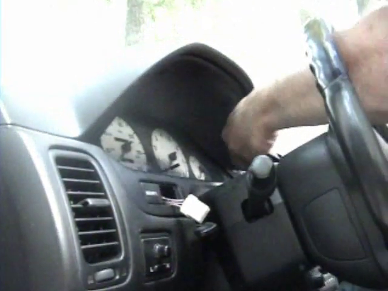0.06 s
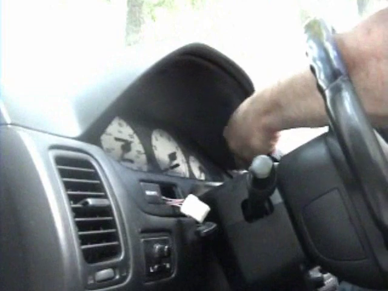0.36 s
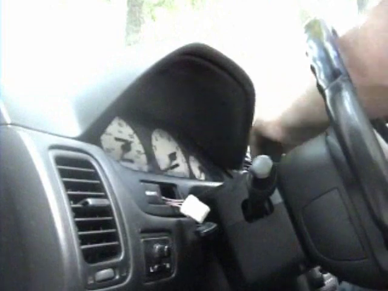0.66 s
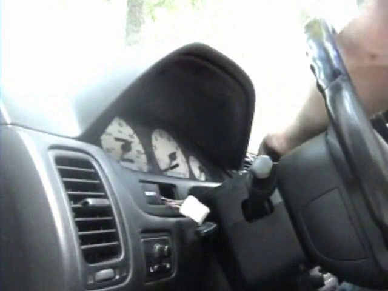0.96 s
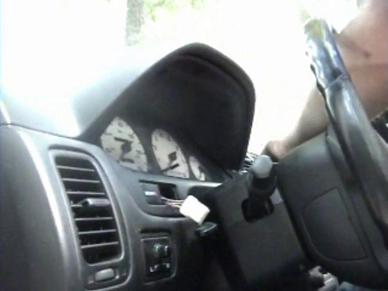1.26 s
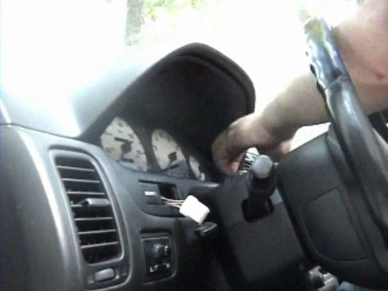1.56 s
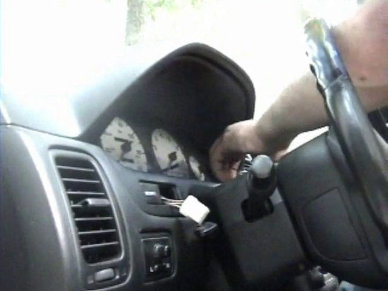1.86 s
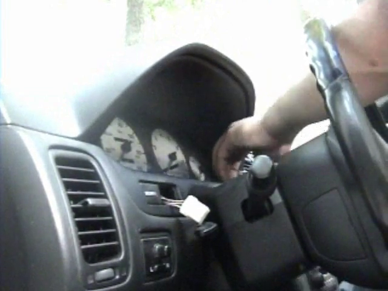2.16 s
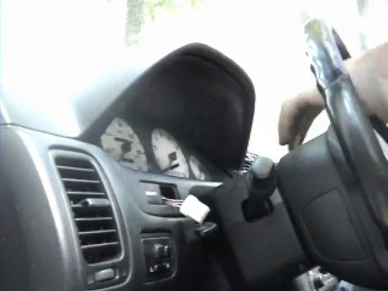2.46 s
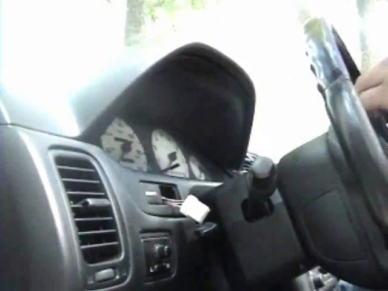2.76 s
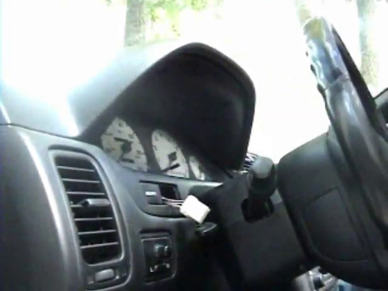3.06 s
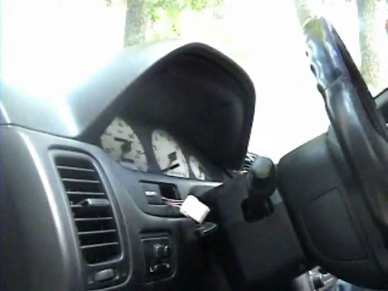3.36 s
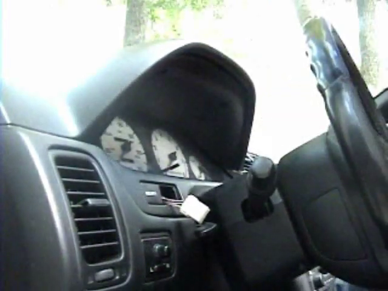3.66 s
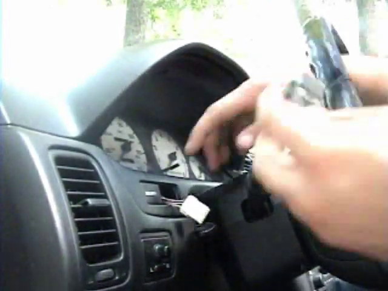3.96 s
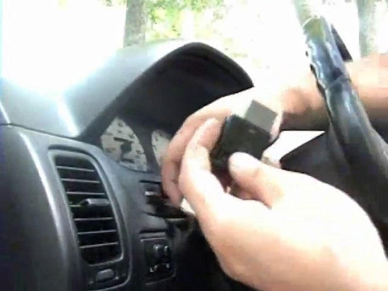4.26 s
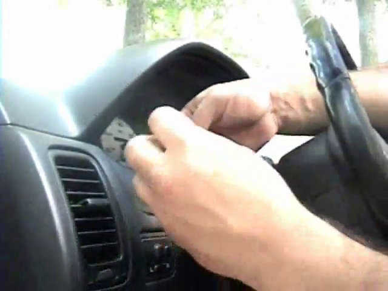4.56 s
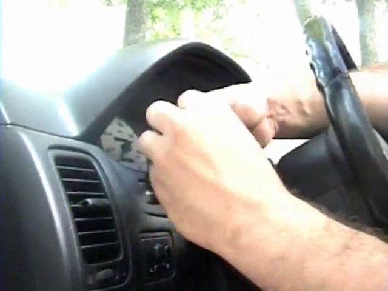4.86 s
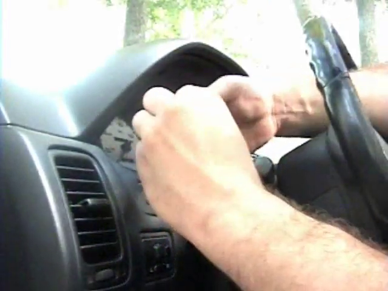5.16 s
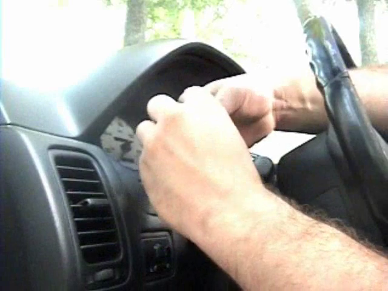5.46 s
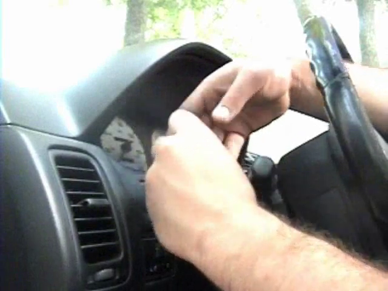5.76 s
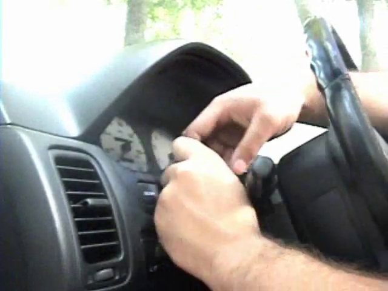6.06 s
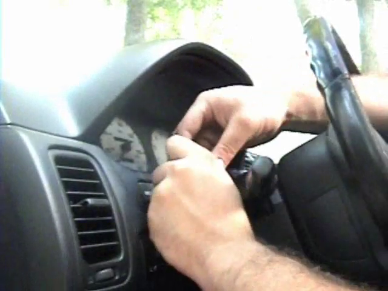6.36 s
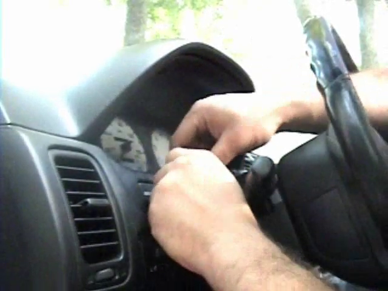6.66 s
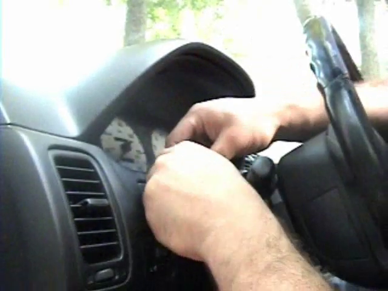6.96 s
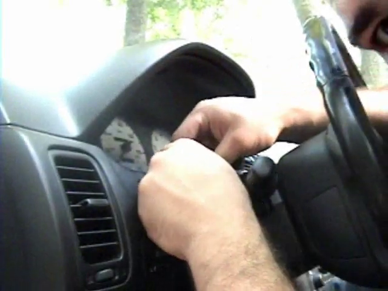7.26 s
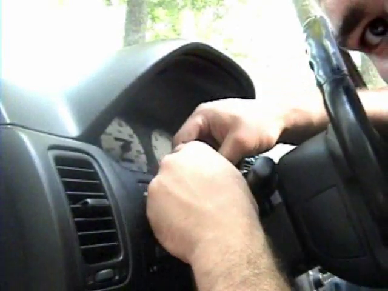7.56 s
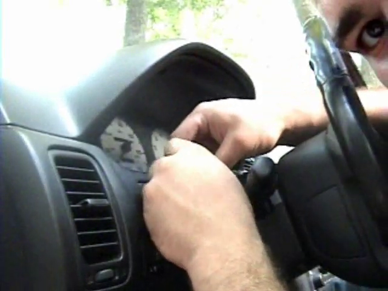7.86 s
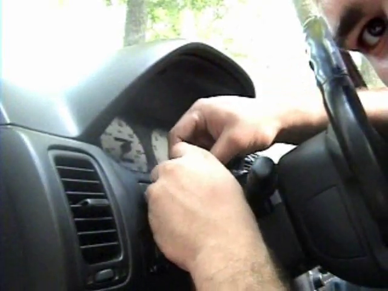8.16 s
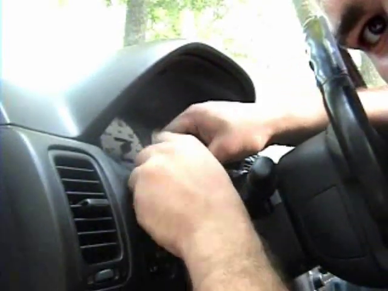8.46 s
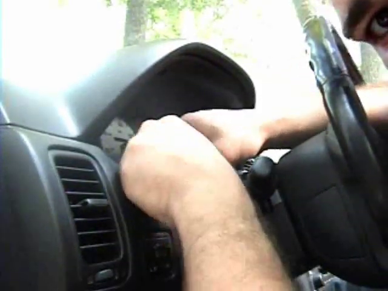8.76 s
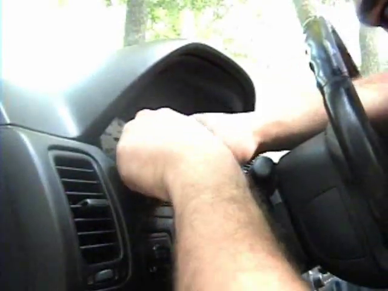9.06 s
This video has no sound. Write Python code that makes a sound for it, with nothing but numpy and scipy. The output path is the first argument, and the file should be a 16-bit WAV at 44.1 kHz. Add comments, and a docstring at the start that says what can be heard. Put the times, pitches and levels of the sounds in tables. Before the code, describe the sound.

A switch and its connector are pressed into car dashboard trim, with sharp snaps, small knocks and scraping over a faint cabin rumble.

```python
"""Close plastic snaps and knocks: hands work a switch and its connector into a parked car's dashboard.
Each contact rings the small part and the panel behind it (the switch itself when held free) and dies
fast in the padded cabin; some trail a low dashboard boom. Between the clicks plastic scrapes and squeaks,
and a spring buzzes once as the connector latches. A faint cabin rumble lies underneath."""
import sys
import numpy as np
from scipy import signal
from scipy.fft import rfft, irfft, next_fast_len
from scipy.io import wavfile

SR = 44100
rng = np.random.default_rng(int(sys.argv[2]) if len(sys.argv) > 2 else 0)


def master_out(mix):
    """Clip the mix to full scale and print it as 16-bit PCM to the path in sys.argv[1]."""
    frames = np.transpose(np.atleast_2d(mix))
    ceiling = np.clip(frames, -1, 1)
    pcm = np.round(ceiling * 32767).astype(np.int16)
    wavfile.write(sys.argv[1], SR, pcm)


N = 410552
EVENT_SAMPLES, CONTACT_SAMPLES, LEAD_SAMPLES = 16384, 8192, 400


def undb(db):
    """Decibels to gain."""
    return 10 ** (np.asarray(db) / 20)


def unit(x):
    """Scale to rms 1."""
    return x / np.sqrt(np.mean(x ** 2))


def freqs(size):
    """FFT bin frequencies in Hz, floored at 1."""
    return np.maximum(np.fft.rfftfreq(size, 1 / SR), 1)


def along(points, hz):
    """Interpolate (f/Hz, value) points on a log-frequency axis."""
    f, value = np.transpose(points)
    return np.interp(np.log(hz), np.log(f), value)


def hump(f, hz, width_hz):
    """One resonance, 1 at its centre."""
    return 1 / (1 + (2 * (f - hz) / width_hz) ** 2)


def rolloff_db(ratio):
    """First-order slope: low-pass for f / corner, high-pass for corner / f."""
    return -10 * np.log10(1 + ratio ** 2)


def decay(t, t60_s):
    """Exponential fall, 60 dB in t60_s."""
    return np.exp(-np.log(1000) * t / t60_s)


def shape(x, db):
    """Zero-phase filter from a dB curve."""
    return irfft(rfft(x) * undb(db), x.shape[-1])


def ring(x, db):
    """Minimum-phase filter from a dB curve: resonances ring after the blow."""
    cepstrum = irfft(np.log(undb(db)))
    half = len(cepstrum) // 2
    cepstrum[1:half] *= 2
    cepstrum[half + 1:] = 0
    return irfft(rfft(x) * np.exp(rfft(cepstrum)))


def add(out, x, start_s):
    """Mix a mono or stereo sound into both channels."""
    i = max(int(start_s * SR), 0)
    out[:, i:i + x.shape[-1]] += x[..., :max(N - i, 0)]


def walk(rate_hz, size):
    """Smooth random wander, spread near 1."""
    steps = rng.standard_normal(int(size / SR * rate_hz) + 2)
    return np.interp(np.arange(size) / SR * rate_hz, np.arange(len(steps)), steps)


# Cabin noise spectrum: f/Hz, relative density/dB
CABIN_SPECTRUM = [(25, -27), (60, -11), (95, -9), (116, 1.5), (142, -10), (185, -5.5), (270, -14),
                  (370, -17.5), (480, -17), (570, -12.5), (700, -16), (900, -17.5), (1400, -22),
                  (3000, -27.5), (5000, -30.5), (7600, -37)]
# Cabin noise width: f/Hz, side over mid/dB
CABIN_WIDTH = [(60, -7.5), (150, -11.5), (300, -1), (900, 0), (2500, 1.5), (4400, -9.5), (7500, -43.5)]


def cabin(level_db=-46, waver_db=0.7, waver_hz=5, rumble_top_hz=600):
    """Outdoor rumble booms faintly in the cabin and wavers under a smooth hiss."""
    size = next_fast_len(N, real=True)
    f = freqs(size)
    mid, side = shape(rng.standard_normal((2, size)), along(CABIN_SPECTRUM, f))
    side = shape(side, along(CABIN_WIDTH, f))
    noise = np.array([mid + side, mid - side])
    rumble = shape(noise, rolloff_db(f / rumble_top_hz))
    noise += rumble * (undb(waver_db * walk(waver_hz, size)) - 1)
    return undb(level_db) * unit(noise[:, :N])


# Skin and plastic squeaks: t/s, length/s, level/dB, first f/Hz, last f/Hz
SQUEAKS = [(.17, .19, -59, 2550, 2450), (2.74, .12, -60, 3700, 3400), (4.02, .12, -57.5, 1140, 1290),
           (4.07, .17, -57, 1040, 880), (4.14, .11, -58, 1290, 1040), (8.307, .026, -35, 4400, 4560)]


def squeaks(jitter=0.0088, jitter_hz=200, steady_cycles=7):
    """Slips fall into a loose rhythm and sound a rough gliding tone."""
    out, t = np.zeros((2, N)), np.arange(EVENT_SAMPLES) / SR
    for start, length, db, first_hz, last_hz in SQUEAKS:
        progress = np.minimum(t / length, 1)
        glide_hz = first_hz + (last_hz - first_hz) * progress
        hz = glide_hz * (1 + jitter * walk(jitter_hz, len(t)))
        grip_hz = first_hz / steady_cycles
        grip = walk(grip_hz, len(t)) + 1j * walk(grip_hz, len(t))  # slip strength and timing wander
        tone = np.real(grip * np.exp(2j * np.pi * np.cumsum(hz) / SR))
        add(out, 2 * undb(db) * np.sin(np.pi * progress) * tone, start)
    return out


def spring(start_s=5.499, hz=3270, width_hz=380, level_db=-39, t60_s=0.29):
    """The spring in the switch buzzes on after the connector latches."""
    out, t = np.zeros((2, N)), np.arange(EVENT_SAMPLES) / SR
    resonance_db = 20 * np.log10(hump(freqs(len(t)), hz, width_hz))
    buzz = unit(shape(rng.standard_normal(len(t)), resonance_db))
    add(out, undb(level_db) * decay(t, t60_s) * buzz, start_s)
    return out


# Low dashboard booms after snaps and knocks: t/s, level/dB, boom f/Hz, sway over boom/dB
BOOMS = [(0.061, -30.5, 168, -23), (0.419, -30, 113.8, 1), (1.125, -45, 113, 12), (1.403, -23.5, 127.3, -6),
         (2.098, -36, 186, -0.5), (4.275, -28.5, 114.6, -28), (4.291, -33.5, 169, -28),
         (5.508, -32, 221, -2), (6.159, -28, 112, -22), (6.325, -30.5, 178, -25), (8.347, -30.5, 159, -23),
         (9.223, -33, 122, -2)]


def booms(rise_s=0.002, t60_s=0.22, sway_hz=37):
    """The dashboard booms low just after a snap or knock and sways in its lowest mode."""
    out, t = np.zeros((2, N)), np.arange(EVENT_SAMPLES) / SR
    swing = decay(t, t60_s) * (1 - np.exp(-t / rise_s))
    for start, db, boom_hz, sway_db in BOOMS:
        boom = np.sin(2 * np.pi * boom_hz * t)
        sway = undb(sway_db) * np.sin(2 * np.pi * sway_hz * t)
        add(out, undb(db) * swing * (boom + sway), start)
    return out


# Panel and cabin decay: f/Hz, t60/s
CABIN_DECAY = [(70, 0.45), (200, .13), (550, 0.12), (1500, 0.088), (4000, 0.071), (8000, 0.11)]


def reflections(size, build_s=0.00058, build_cycles=0.98):
    """Dense cabin reflections as (mid, side); the bass builds late and stays."""
    t, f = np.arange(size) / SR, freqs(size)
    noise = rfft(rng.standard_normal((2, size)))
    centres = [hz for hz, _ in CABIN_DECAY]
    out = 0
    for (hz, t60_s), selector in zip(CABIN_DECAY, np.eye(len(centres))):
        band = irfft(noise * along(list(zip(centres, selector)), f))
        fade = decay(t, t60_s) * (1 - np.exp(-t / (build_s + build_cycles / hz)))
        out = out + band * fade / np.linalg.norm(fade)
    return out


# Contact and scrape width: f/Hz, side gain/dB
CONTACT_WIDTH = [(60, -6), (250, -20.5), (700, -11.5), (1500, -4), (2600, -8.5), (4000, -9), (8000, -22.5)]
# Left-right level difference: f/Hz, share of pan_db
PAN_SHARE = [(300, .05), (600, 0.27), (1300, 0.37), (2600, 0.78), (3600, 0.059)]


def place(mid, side, pan_db):
    """Mid and side to stereo, leaning left mostly in the middle frequencies."""
    f = freqs(len(mid))
    side = shape(side, along(CONTACT_WIDTH, f))
    lean_db = pan_db * along(PAN_SHARE, f) / 2
    return np.array([shape(mid + side, lean_db), shape(mid - side, -lean_db)])


# Dashboard panel and cabin modes: f/Hz, width/Hz, gain/dB
PANEL_MODES = [(106, 37, 8), (176.3, 88, 10.5), (246, 62, 10), (425, 142, 11), (599, 33, 7.5),
               (785, 180, 6), (984, 74, 6.5), (1270, 120, 2.5), (2010, 120, 0), (2507, 200, 3),
               (3970, 590, 3.5), (7430, 900, -5)]
# Hand-held switch modes: f/Hz, width/Hz, gain/dB
SWITCH_MODES = [(127, 16, 2), (242, 26, 3.5), (1617, 230, 10.5), (1885, 170, 7.5), (2240, 920, 4),
                (2605, 150, 3.5), (3470, 46, -6), (4540, 330, 3.5), (6160, 2700, 10)]


def modes_db(modes, f):
    """Colour that a body's resonances give to whatever touches it."""
    return sum(db * hump(f, hz, width_hz) for hz, width_hz, db in modes)


# Plastic and skin sliding: t/s, length/s, level/dB, centre f/Hz
SCRAPES = [(.005, 0.19, -52, 2800), (.507, 0.18, -44, 1160), (0.651, .16, -48.5, 3120),
           (0.923, 0.048, -33, 1700), (0.954, .059, -42, 1000), (1.461, 0.22, -34.5, 1340),
           (1.607, 0.31, -48.5, 1310), (2.023, 0.15, -34.5, 1500), (2.26, 0.084, -43.5, 1470),
           (2.688, 0.31, -56.5, 3300), (3.709, 0.073, -51, 5300), (3.856, 0.043, -49.5, 4850),
           (4.28, 0.12, -48.5, 2200), (6.382, .32, -46.5, 1490), (7.159, 0.12, -45, 1500),
           (8.111, 0.13, -47, 1300), (8.247, .063, -43, 1590), (8.298, 0.033, -33.5, 5500),
           (8.457, 0.3, -45.5, 1130)]


def scrapes(grains_per_s=900, spread_db=6, jerk_db=4, jerk_hz=70, focus_db=10, focus_q=0.74,
            panel_share=0.94, low_hz=200, dull_hz=3000):
    """Sliding plastic catches and slips in dense, uneven grains that ring the panel."""
    out, size = np.zeros((2, N)), EVENT_SAMPLES
    t, f = np.arange(size) / SR, freqs(size)
    colour_db = panel_share * modes_db(PANEL_MODES, f) + rolloff_db(f / dull_hz) + rolloff_db(low_hz / f)
    for start, length, db, hz in SCRAPES:
        stroke = np.sin(np.pi * np.minimum(t / length, 1))
        catches = rng.random(size) < grains_per_s / SR
        strength = undb(spread_db * rng.standard_normal(size) + jerk_db * walk(jerk_hz, size))
        grains = catches * strength * stroke * rng.choice([-1, 1], size)
        sound = signal.fftconvolve(reflections(size), grains[None], axes=1)[:, :size]
        sound[0] += grains  # direct sound, mid only
        sound = ring(sound, colour_db + focus_db * hump(f, hz, hz / focus_q))
        stereo = unit(place(*sound, pan_db=6)) * np.sqrt(length * SR / size)  # rms 1 over the stroke
        add(out, undb(db) * stereo, start)
    return out


def contact_force(hard_db, creep_db=-10, creep_s=0.0015, slip_s=0.002, softening=0.49):
    """A catch creeps up, then lets go in a rush of tiny slips, longer when soft."""
    t = (np.arange(CONTACT_SAMPLES) - LEAD_SAMPLES) / SR
    release_s = slip_s * undb(-softening * min(hard_db, 0))
    fade = np.exp(-np.abs(t) / np.where(t < 0, creep_s, release_s))
    slips = np.where(t < 0, undb(creep_db), 1) * fade * rng.standard_normal(len(t))
    return slips / np.linalg.norm(slips)


# Edges of six contact bands: f/Hz
BAND_EDGES = [60, 250, 650, 1400, 2500, 4500, 8000]


def band_db(x, contact_s=0.0024):
    """Level per band: its energy over the time of one contact."""
    power = np.abs(rfft(x)) ** 2 * 2 / (len(x) * contact_s * SR)
    return 10 * np.log10(np.histogram(freqs(len(x)), BAND_EDGES, weights=power)[0])


# Contact colour, a row per band: level/dB, share of weight, share of hardness
CONTACT_COLOUR = [(-2, 1.18, 0.24), (1.5, 1.2, 0.024), (1, 0.81, 0.095), (0, 0.12, 0.035),
                  (-4.5, 0.068, 0.54), (-10.5, 0.26, 1)]


def contact(body, weight_db, hard_db, ring_hz, ring_db, direct_db, ring_q=6.6, part_hz=600, sub_hz=50):
    """A contact rings the part, its body and the cabin; weight adds bass, hardness treble."""
    f = freqs(CONTACT_SAMPLES)
    sound = np.pad(reflections(CONTACT_SAMPLES), ((0, 0), (LEAD_SAMPLES, 0)))[:, :CONTACT_SAMPLES]
    direct = ring(contact_force(hard_db), rolloff_db(part_hz / f))  # a small part radiates little bass
    sound[0] += undb(direct_db) * direct
    sound = ring(sound, modes_db(body, f) + rolloff_db(sub_hz / f))
    centres = np.sqrt(np.multiply(BAND_EDGES[:-1], BAND_EDGES[1:]))
    colour_db = np.dot(CONTACT_COLOUR, [1, weight_db, hard_db])
    for _ in range(2):  # pull the band levels towards colour_db
        gains_db = colour_db - band_db(sound[0])
        sound = ring(sound, along(list(zip(centres, gains_db)), f))
    part_power = 1 + (undb(ring_db) ** 2 - 1) * hump(f, ring_hz, ring_hz / ring_q)
    sound = ring(sound, 10 * np.log10(part_power))
    return place(*sound, pan_db=9)


# Switch held free of the panel: first t/s, last t/s
IN_HAND = [(3.6, 4.1), (4.8, 6.0)]


def in_hand(time_s):
    """True while the switch is held free."""
    return any(first < time_s < last for first, last in IN_HAND)


def knock(time_s, weight_db, hard_db):
    """A plain contact against the trim, or higher and drier on the hand-held switch."""
    if in_hand(time_s):
        return contact(SWITCH_MODES, weight_db, hard_db, ring_hz=2010, ring_db=8.9, direct_db=3.5)
    return contact(PANEL_MODES, weight_db, hard_db, ring_hz=1416, ring_db=4.97, direct_db=1.4)


# Fingers shifting grip: first t/s, last t/s
GRIP_SHIFTS = [(0.501, .85), (5.7, 6.05), (6.599, 6.8), (7.7, 7.9), (8.4, 9.0)]


def touches(ticks_per_s=5, level_db=-45.5, spread_db=3):
    """Faint ticks fall at random while the fingers shift their grip."""
    out = np.zeros((2, N))
    for first, last in GRIP_SHIFTS:
        for start in rng.uniform(first, last, round((last - first) * ticks_per_s)):
            db = level_db + spread_db * rng.standard_normal()
            add(out, undb(db) * knock(start, weight_db=3, hard_db=1), start)
    return out


# Parts knocking: t/s, level/dB, panel weight/dB, hardness/dB
KNOCKS = [(0.0494, -46.5, 9.5, 7), (0.1017, -45, 8.5, 4), (.542, -39, 2.5, 6), (0.5571, -37, 2, 2),
          (.611, -41, 2, -16), (.8803, -26, 3.5, -5.5), (0.9601, -20.5, 2.5, -6.5), (0.9792, -24.5, 2, -9),
          (1.062, -33, -6.5, 3.5), (1.1981, -32.5, 3, -6), (1.3687, -32.5, -5.5, 0), (1.5448, -41, 12.5, 0),
          (1.5577, -29, 6.5, -8), (1.5748, -29, -10, -1), (1.597, -28.5, -0.5, -2), (1.6785, -36.5, 5, 1),
          (1.7546, -35, -0.5, 5.5), (1.7895, -31, -1, -13), (1.9604, -30, 1, -0.5), (2.02, -40.5, 3.5, -3),
          (2.1264, -29.5, -1.5, -1), (2.206, -32.5, -2, 1.5), (2.256, -35, -3.5, 3), (2.285, -32, 0.5, 2.5),
          (2.299, -33.5, -2.5, 3), (2.3255, -32, -0.5, 7.5), (3.7833, -36, -23, -12), (3.892, -43, -11, -4),
          (4.2562, -27, 5, -4), (4.265, -37, -3, -24), (4.352, -47, 5, 10), (4.5464, -48, 12.5, 7),
          (4.922, -33.5, -8.5, 0), (4.95, -46, -1, 4), (4.9905, -31.5, -10, -4), (5.1762, -46.5, 3, 10),
          (5.2218, -44, 5, 11), (5.3502, -45, -3, 14), (5.843, -49, -11, 20), (5.9285, -50, -9, 19.5),
          (6.0477, -30.5, 5.5, 2), (6.061, -41, 5, 3), (6.3092, -20.5, 2, -2.5), (6.3195, -24, -1.5, 3),
          (6.4264, -29, 5.5, -2.5), (6.4447, -30, 2.5, 1), (6.5559, -30, 0.5, -3.5),
          (6.572, -24.5, -1, -15), (6.6159, -38, 3, -10), (6.806, -38.5, -2, -4), (7.2244, -33.5, 5, -5),
          (7.242, -36.5, 0, -9), (7.3538, -42, 6, -9), (7.437, -30.5, -5, -6), (7.662, -47, 9, 0),
          (7.7519, -48, 12.5, -8), (7.9526, -42, 13, 1.5), (8.1633, -30.5, 7.5, 0),
          (8.1726, -29.5, 0.5, -3), (8.2917, -33.5, 9, 9), (8.4919, -40, 9, 3.5), (8.6367, -39.5, 10, -3.5),
          (8.7, -43.5, 4.5, 8), (8.8089, -41, 4, -2), (8.9291, -34, 0.5, 9.5), (9.1233, -30.5, -1, 8.5),
          (9.1442, -31.5, 0, 1), (9.161, -34.5, 8, -1.5)]


def knocks():
    """Parts knock together as they are lined up and pushed home."""
    out = np.zeros((2, N))
    for start, db, weight_db, hard_db in KNOCKS:
        add(out, undb(db) * knock(start, weight_db, hard_db), start - LEAD_SAMPLES / SR)
    return out


# Latch snaps: t/s, level/dB, panel weight/dB, hardness/dB, ring f/Hz, ring gain/dB, direct gain/dB
SNAPS = [(.399, -25.5, 1, 20, 4300, -0.5, 0), (0.8573, -18.5, -0.5, -5.5, 1830, 3.5, 3.5),
         (1.124, -14, -7, 5, 1310, 18.5, 8), (1.2675, -20.5, -1.5, 1, 1440, 5.5, 1.5),
         (1.3967, -11, -3, 1.5, 2650, 7, 4.5), (2.0858, -17.5, -6.5, 0, 845, 12, -3),
         (2.092, -17.5, -2, 9.5, 1490, 9, 1.5), (4.9983, -24.5, -7.5, 1, 2250, 11, -0.5),
         (5.0503, -29, -5.5, -0.5, 2110, 11, 8), (5.497, -15.5, -13, 13.5, 2760, 6, 1),
         (6.101, -16, -4.5, -6, 1310, 4, 3), (6.1423, -17.5, 2, -2, 2010, 12, 3),
         (6.9188, -25.5, 3.5, -0.5, 3850, 11, 7.5), (8.34, -21.5, 2, 3.5, 1520, 10.5, 3),
         (9.214, -9.5, -2.5, 6, 1360, 5, 0)]


def snaps():
    """Each latch lets go with its own crack and ring."""
    out = np.zeros((2, N))
    for start, db, *character in SNAPS:
        body = SWITCH_MODES if in_hand(start) else PANEL_MODES
        add(out, undb(db) * contact(body, *character), start - LEAD_SAMPLES / SR)
    return out


def scene():
    """Handling sounds over the quiet cabin, in stereo."""
    return cabin() + snaps() + spring() + knocks() + scrapes() + squeaks() + booms() + touches()


def record(dry):
    """Treble ends near 8 kHz; the hardest snaps clip with a faint bright crack."""
    top_hz, cut_hz, ceiling = 7780, 8177, 0.85
    narrow = signal.sosfilt(signal.ellip(10, .2, 70, top_hz, fs=SR, output="sos"), dry)
    clipped = np.clip(narrow, -ceiling, ceiling)
    return signal.sosfilt(signal.ellip(6, .2, 20, cut_hz, fs=SR, output="sos"), clipped)


dry = scene()
out = record(dry)
master_out(out)
```